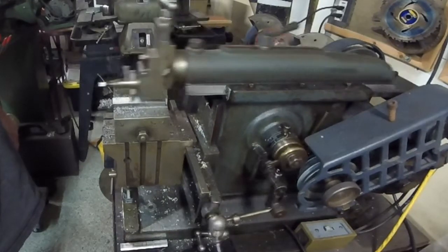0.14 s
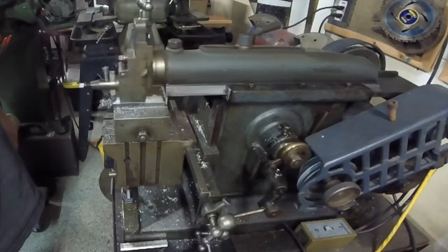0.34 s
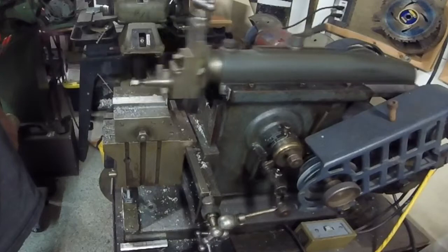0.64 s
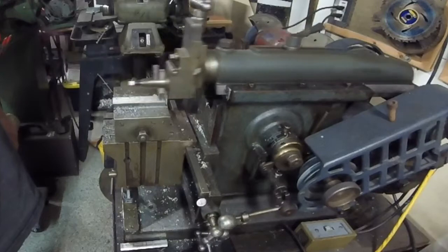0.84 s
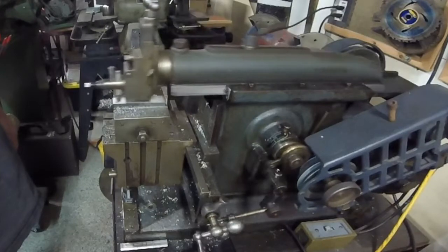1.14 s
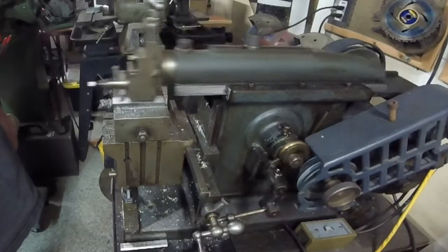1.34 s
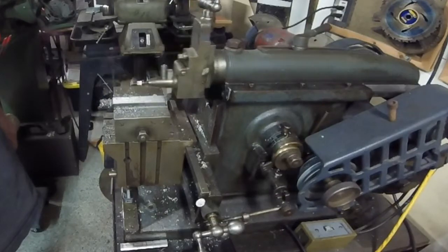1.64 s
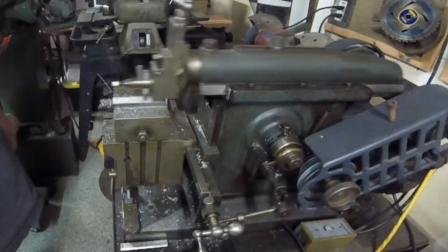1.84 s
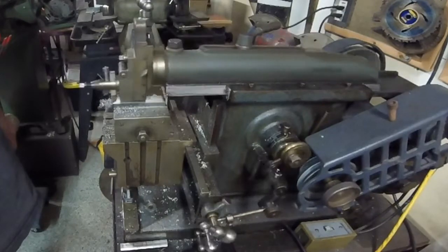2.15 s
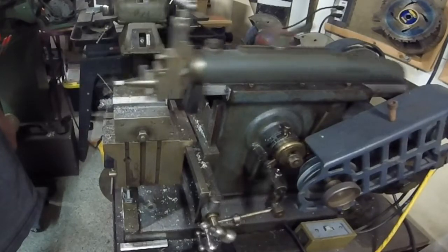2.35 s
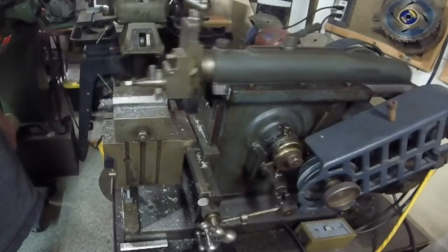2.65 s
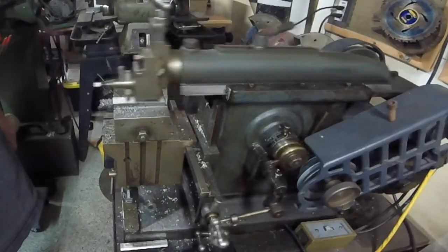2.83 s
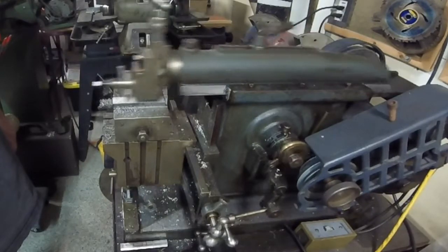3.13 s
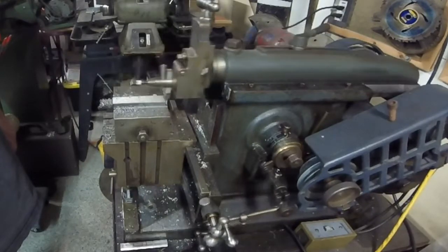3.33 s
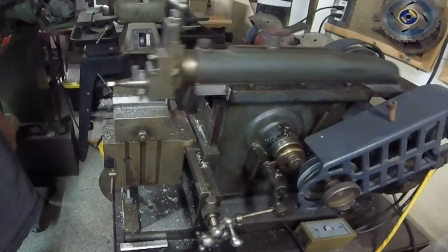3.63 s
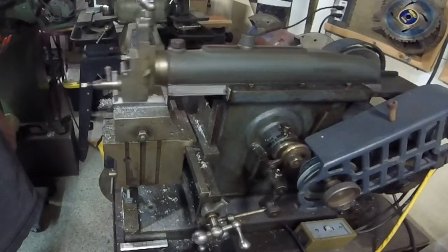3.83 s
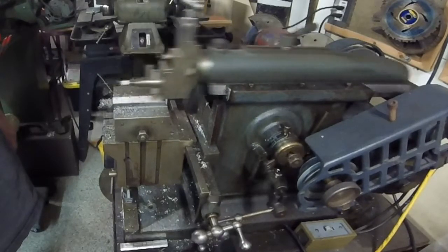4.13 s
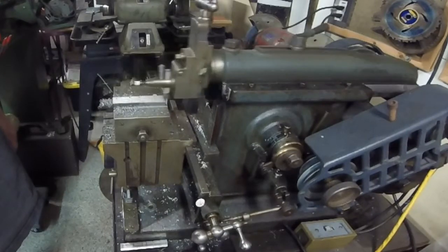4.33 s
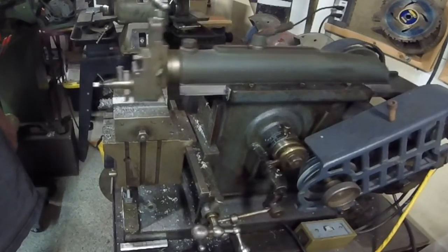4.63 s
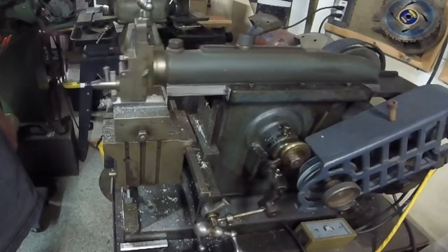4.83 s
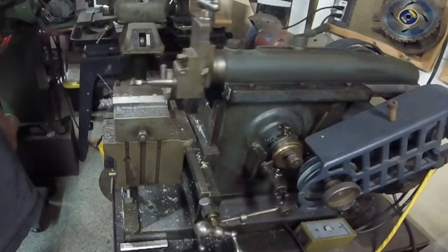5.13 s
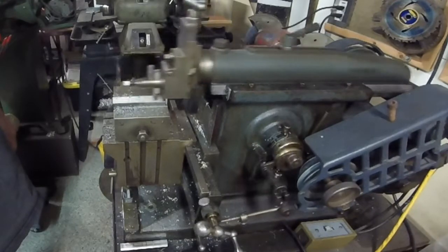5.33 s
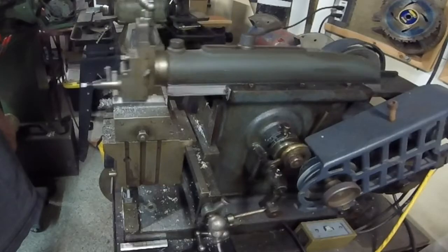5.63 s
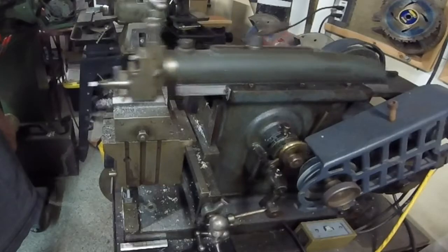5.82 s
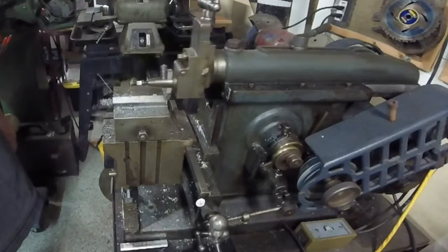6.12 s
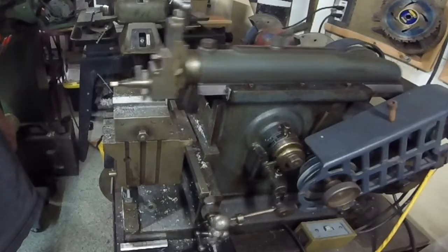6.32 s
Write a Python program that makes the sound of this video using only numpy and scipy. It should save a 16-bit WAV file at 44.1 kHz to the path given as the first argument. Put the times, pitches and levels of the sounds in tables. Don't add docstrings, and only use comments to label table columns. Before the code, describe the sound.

A motor hums low and constant beneath coarse gear rumble as a shaper's ram slides on its ways. Each cycle brings a crisp, fast burst of four metallic clacks, then a swelling cut with buzz and hiss, then soft knocks and a thump at reversal. Faint ticks fall between, and light steel scraping appears midway and near the end. Close single microphone, small workshop, short faint echoes.

```python
import sys
import numpy as np
from scipy import signal
from scipy.fft import rfft, irfft, next_fast_len
from scipy.io import wavfile

SR = 44100
rng = np.random.default_rng(int(sys.argv[2]) if len(sys.argv) > 2 else 0)


def transcribe(signal):
    frames = np.atleast_2d(signal).T
    limited = np.clip(frames, -1, 1)
    pcm = np.round(limited * 32767).astype(np.int16)
    wavfile.write(sys.argv[1], SR, pcm)


def invert_db(x):
    u = np.asarray(x, float) / 20
    return 10 ** u


N = 285315

# first_tooth_s, pawl_peak_db, load of the following cut_db, its friction_db
STROKES = [
    (-.337, -22, -0.1, 0),
    (0.5524, -21.5, -0.3, 0),
    (1.4415, -18, 0.4, 0),
    (2.3308, -19, 0.4, 1.5),
    (3.2179, -19.5, -0.4, 0.2),
    (4.1077, -20, -1, 1),
    (5.02, -20.5, -0.2, 0.3),
    (5.906, -21.5, 0.4, 0.2),
    (6.795, -20, 0, 0),
]
# idle_db, cut_gain_db, crest_s after the first tooth,
# end_s before the next teeth, sharpness (a power), return_gain_db
ANSWERS = dict(base=(-33.5, 10.5, 0.41, 0.02, 0.48, -0.6), column=(-43, 17, 0.64, 0.2, 0.1, 0.5),
           frame=(-47.5, 11, 0.61, 0.23, 0.47, 3.5))
# pitch_hz, level_db per Hz
BUZZ = [(410, -45), (700, -2), (752, -8.5), (813, -3.5), (1110, -10.5), (1210, -5.5), (1370, -14.5),
        (1890, -9.5), (2320, -24), (3300, -33), (4290, -54), (7260, -120)]
# pitch_hz, level_db per Hz
WAYS = [(1350, -19), (2300, -9), (2690, -3), (3100, -1), (4110, -2.5), (5200, -2.5), (5540, -8),
        (6330, -3.5), (7520, -16.5), (8200, -6), (9080, -15.5), (11000, -16), (15000, -35)]
# pitch_hz, level_db per Hz
CLACK = [(410, -28), (700, -3), (1130, -11), (1240, -1), (1530, -7.5), (2000, -3.5), (2310, -11),
         (3160, -2), (3990, -7), (5240, -5), (5660, -9.5), (6120, -5.5), (7340, -8.5), (11400, -17.5),
         (15600, -30)]


def rms_one(x):
    return x / np.sqrt(np.mean(x ** 2) + 1e-20)


def drift(rate):
    r = np.exp(-80 * np.pi * rate / SR)
    slow = signal.lfilter([1], [1, -2 * r, r * r], rng.standard_normal(N // 40 + 2002))[2000:]
    return np.interp(np.arange(N) / 40, np.arange(len(slow)), rms_one(slow))


def above(x, hz):
    return signal.sosfilt(signal.butter(2, hz, "high", fs=SR, output="sos"), x)


def between(x, low_hz, high_hz, order=2):
    return signal.sosfilt(signal.butter(order, [low_hz, high_hz], "band", fs=SR, output="sos"), x)


def colour(x, spectrum):
    hz, db = np.transpose(spectrum)
    size = next_fast_len(len(x), True)
    grid = np.arange(size // 2 + 1) * SR / size + 1
    gain = invert_db(np.interp(np.log(grid), np.log(hz), db, -120, -120))
    return irfft(rfft(x, size) * gain, size)[:len(x)]


def resonate(x, peaks):
    out = 0
    for k, (hz, width, db) in enumerate(peaks):
        r = np.exp(-np.pi * width / SR)
        a = [1, -2 * r * np.cos(2 * np.pi * hz / SR), r * r]
        out = out + (-1) ** k * invert_db(db) * signal.lfilter([(1 - r * r) / 2, 0, (r * r - 1) / 2], a, x)
    return out


def ring(clicks, hz, t60):
    r, w = invert_db(-60 / (t60 * SR)), 2 * np.pi * hz / SR
    return signal.lfilter([0, np.sin(w)], [1, -2 * r * np.cos(w), r * r], clicks + 1e-18)


def grains(per_s, spread_db):
    out = np.sign(rng.random(N) - .5) * (rng.random(N) < per_s / SR)
    out[out != 0] *= invert_db(spread_db * np.minimum(rng.exponential(1, N)[out != 0], 4))
    return rms_one(out)


def strikes(seconds, levels_db):
    clicks = np.zeros(N)
    clicks[np.round(np.asarray(seconds) * SR).astype(int)] = invert_db(levels_db)
    return clicks


def dying(clicks, t60):
    return signal.lfilter([1], [1, -invert_db(-60 / (t60 * SR))], clicks + 1e-18)


def hump(start, crest, end):
    return np.sin(np.pi / 2 * np.interp(np.arange(0, N / SR, .001), [start, crest, end], [0, 1, 0])) ** 2


def ram_level(idle_db, cut_db, crest, early, sharpness, return_db, axis=0):
    db = 0
    for (s, _, *effort_db), after in zip(STROKES, STROKES[1:]):
        cut = hump(s + 0.29, s + crest, after[0] - early) ** sharpness
        quick_return = hump(s - .13, s + 0.02, s + .36)
        db = db + (cut_db + effort_db[axis]) * cut + return_db * quick_return
    return idle_db + np.interp(np.arange(N) / SR * 1000, np.arange(len(db)), db)


def hum_level():
    # deepest_s, sag_db, rebound_db
    sags = [
        (.845, -6, 0),
        (1.78, -6, 3),
        (2.655, -8, 3),
        (3.42, -2, 0.5),
        (4.43, -11, 1),
        (5.285, -5, 2.5),
        (6.205, -15, 3.5),
    ]
    sag_s, rebound_after_s, rebound_s = 0.025, 0.071, 0.026
    t = np.arange(N) / SR
    dips = 0
    for s, sag, up in sags:
        dips = dips + sag * np.exp(-((t - s) / sag_s) ** 2)
        dips = dips + up * np.exp(-((t - s - rebound_after_s) / rebound_s) ** 2)
    return ram_level(-26.5, 1.5, 0.6, 0.092, 1, 0) + dips + 0.66 * drift(8.0)


def motor():
    # multiple of the hum pitch, level_db against it, wobble_db
    hum_orders = [(2.0, -14, 1.5), (3.0, -12, 3.0)]
    hum_hz, rotor_hz = 119.94, 29.63
    t = np.arange(N) / SR
    phase = 2 * np.pi * hum_hz * t + 0.24 * drift(2.8)
    turn = 2 * np.pi * rotor_hz * t
    upper = 0
    for k, db, wobble in hum_orders:
        upper = upper + invert_db(db + wobble * drift(5.8)) * np.sin(k * phase + 0.52 * drift(4.9))
    main = (1 + 0.06 * np.sin(turn + 1.55 * drift(2.3))) * np.sin(phase)
    rotor = invert_db(-50 + 2.5 * drift(2.3)) * np.sin(2 * turn)
    return np.sqrt(2) * (invert_db(hum_level()) * main + invert_db(-26.5) * upper + rotor)


def gear_rumble(casting):
    return rms_one(sum(resonate(invert_db(1.5 * drift(33)) * grains(900, spread_db=2.0), [peak]) for peak in casting))


def gears():
    # pitch_hz, width_hz, level_db
    base = [(137.7, 25.5, 0.5), (215, 13, -6), (268, 32, 1.5), (277, 56, -6.5), (349.7, 48.4, 2),
            (400, 87, -13.5)]
    # pitch_hz, width_hz, level_db
    column = [(491, 35, -7.5), (532, 10.5, 2.5), (566.5, 18.4, -1.5), (650.7, 13.7, 0.5), (730, 46, -11.5),
              (917, 17, -16)]
    base_db, column_db = ram_level(*ANSWERS["base"]), ram_level(*ANSWERS["column"])
    rumble = invert_db(base_db - 2.5) * gear_rumble(base) + invert_db(column_db - 2.5) * gear_rumble(column)
    rumble = signal.sosfilt(signal.butter(2, 1100, fs=SR, output="sos"), rumble)
    mesh = np.sin(2 * np.pi * 543.6 * np.arange(N) / SR + 1.22 * drift(4.5))
    mesh_db = -41.5 + 0.94 * (column_db - column_db.mean()) + 3.6 * drift(4.9)
    return rumble + invert_db(mesh_db) * mesh


def sliding_ram():
    # pitch_hz, width_hz, level_db
    ram_modes = [(1850, 40, -2.5), (2072, 94, 3.5), (3180, 71, 1), (6250, 120, 6.5), (7900, 330, -10)]
    ways_answer = (-53.5, 9, .42, .12, .4, 4.0)
    buzz_db = ram_level(*ANSWERS["frame"])
    ways_db = ram_level(*ways_answer, axis=1)
    slide = rng.standard_normal(N) * invert_db(0.99 * drift(22))
    buzz = rms_one(colour(grains(1500, spread_db=0.5), BUZZ)) + invert_db(8.0) * resonate(slide, ram_modes[:2])
    hiss = rms_one(colour(slide, WAYS)) + invert_db(7.0) * resonate(slide, ram_modes[2:])
    hiss += (invert_db(0.36 * (ways_db - ways_db.mean())) - 1) * between(hiss, 7000, 12500)
    whine_peak = [(5230, 200, 0)]
    whine = rms_one(resonate(resonate(slide, whine_peak), whine_peak))
    whine_db = 0.73 * ways_db - 33 + 4 * drift(9)
    return invert_db(buzz_db - 1.5) * buzz + invert_db(ways_db - 5.5) * hiss + invert_db(whine_db) * whine


def shop_rumble():
    # pitch_hz, level_db per Hz
    rumble_colour = [(15, -61), (25, -6), (42, -20), (65, -28), (89, -30), (120, 6), (145, 4.5), (184, -14),
                     (363, -4), (446, -19), (603, -2.5), (1100, -39), (1430, -67), (2420, -120)]
    return invert_db(-33) * rms_one(colour(rng.standard_normal(N), rumble_colour))


def knocks():
    # start_s, peak_db, thud_db against the peak, ring_hz
    slack = [(0.0738, -38, 1, 1850), (0.8084, -32, 3, 2034), (0.9692, -38, 0, 1850),
             (1.7026, -44.5, 20, 2030), (1.86, -38, 5.7, 1850), (2.589, -40, 12.5, 2084),
             (2.7426, -34, 11, 1830), (3.478, -40, 15.5, 2006), (3.6254, -38, -11, 1840),
             (4.366, -36, 8.5, 2000), (4.5123, -35.5, -3, 1850), (5.2811, -37, 11, 2090),
             (6.166, -31, 6.5, 2025)]
    out = np.zeros(N)
    for s, db, _, hz in slack:
        out += ring(strikes([s, s + .007], [db - 4.5, db - 1.5]), hz, 0.1)
        for ratio, level_db, t60 in [(1.045, -9.0, 0.077), (1.14, -2.0, 0.022), (1.1, -7.0, 0.025)]:
            out += ring(strikes([s], db + level_db), ratio * hz, t60)
    s, db, thud_db = np.transpose(slack)[:3]
    out += rms_one(colour(rng.standard_normal(N), BUZZ)) * dying(strikes(s, db - 1.0), 0.1)
    for hz, level_db, t60 in [(326, 12, 0.034), (617, -1, 0.042)]:
        out += ring(strikes(s, db + thud_db + level_db), hz, t60)
    return out


def ticks():
    # start_s, peak_db, pitch_hz
    chips = [
        (0.4835, -47, 2510),
        (1.23, -53, 3180),
        (3.5149, -43.5, 4650),
        (3.5896, -44, 5200),
        (3.724, -37, 4880),
        (3.9295, -34, 2990),
        (4.4498, -39.5, 2480),
        (5.6047, -42, 5260),
    ]
    hiss = rms_one(above(colour(rng.standard_normal(N), WAYS), 1600))
    s, db = np.transpose(chips)[:2]
    out = hiss * dying(strikes(s, db - 6.0), 0.23)
    for s, db, hz in chips:
        out += ring(strikes([s], db + 0.5), hz, 0.035)
    return out


def thumps():
    # start_s, peak_db, pitch_hz
    backlash = [
        (1.044, -12.5, 357),
        (1.957, -3.5, 326),
        (2.838, -14, 293),
        (4.633, -12, 310),
        (5.535, -9.5, 276),
        (6.382, -12.5, 284),
    ]
    return sum(ring(ring(strikes([s], db - 41.5), hz, 0.038), hz, 0.071) for s, db, hz in backlash)


def small_hits():
    return between(knocks() + ticks() + thumps(), 220, 9000)


def ratchet():
    # after_first_s, level_db, low_ring_db against the peak
    teeth = [
        (0.0, 0.86, -12.5),
        (0.0533, 0.1, -9.5),
        (0.1065, 0.5, -10),
        (.1670, 0.04, -10),
    ]
    # handle_ring_hz, screw_ring_hz, level_db
    handle_rings = [(1222, 2010, 1.5), (1206, 2045, -0.5), (1692, 2035, 0.5), (1453, 2200, 0),
                    (1212, 2045, -0.5), (1220, 2170, -2), (1450, 2010, 0)]
    # pitch_hz, width_hz, level_db
    wheel = [(620, 120, -6), (850, 120, -6), (1228, 70, -6), (2040, 90, -6), (3070, 70, -4), (3250, 70, -2),
             (3680, 80, -4), (3950, 70, -6), (4350, 90, -6), (4725, 90, -5), (5300, 100, -4),
             (5950, 80, -6), (6300, 80, -6), (6610, 70, -6), (6830, 70, -7), (7920, 90, -8),
             (8340, 100, -8), (9300, 120, -14), (10300, 120, -15), (11230, 150, -13)]
    drops = []
    for (at, db, *_), (handle, screw, turn_db) in zip(STROKES[1:], handle_rings):
        for after, tooth_db, low in teeth:
            drops.append((at + after, db + tooth_db, low + turn_db, handle, screw))
    s, peak_db, low_db, *rings_hz = np.transpose(drops)
    count = len(s)
    rings_hz = [hz * (1 + 0.012 * rng.standard_normal(count)) for hz in rings_hz]
    rings_hz.append(rng.choice([hz for hz, _, _ in wheel[4:10]], count))
    bounce = s + .0062 + 0.00064 * rng.standard_normal(count)

    clatter, out = grains(8000, spread_db=1.5), np.zeros(N)
    for hz, width, db in wheel:
        level = peak_db + rng.normal(0, 2.6, count)
        shape = dying(strikes(s, level) + strikes(bounce, level - 6.5), 0.017)
        out += resonate(shape * clatter, [(hz, .7 * width, db + 10.5)])

    t = np.arange(SR // 6) / SR
    for hz, db, t60 in zip(rings_hz, [low_db - 5.0, low_db - 5.0, -17.0], [.13, .11, .06]):
        swell = (1 - np.exp(-t / 0.0016)) * invert_db(-60 * t / t60)
        for at, pitch, gain in zip((s * SR).astype(int), hz, invert_db(peak_db + db)):
            out[at:at + len(t)] += gain * swell * np.sin(2 * np.pi * pitch * t)

    first, second = strikes(s, peak_db), strikes(bounce, peak_db)
    crunch = rms_one(colour(grains(12000, spread_db=3.2), CLACK))
    crunch = crunch - resonate(crunch, [(2760, 350, -11.5)])
    crack = invert_db(-15.5) * dying(first, 0.025) * crunch
    tail = signal.sosfilt(signal.cheby2(8, 30, 14300, fs=SR, output="sos"), crunch)
    tail_level = invert_db(-18.0) * dying(first + second, 0.027) + invert_db(-17.0) * dying(first, 0.33)
    return out + crack + tail_level * tail


def steelwork(x, t60, count=120):
    t = np.arange(SR // 8)[:, None] / SR
    hz = np.linspace(2900, 13600, count) + rng.uniform(-35, 35, count)
    db, phase = rng.uniform(-4, 4, count), rng.random(count)
    modes = np.sum(invert_db(db - 60 * t / t60) * np.sin(2 * np.pi * (hz * t + phase)), axis=1)
    return signal.fftconvolve(x, modes / np.sqrt(np.sum(modes ** 2)))[:N]


def scrapes():
    # start_s, rise_s, peak_db, fall_db per s, low_part_db against the peak
    strokes_by_hand = [
        (2.611, 0.014, -35, 190, -1),
        (2.764, 0.022, -34, 154, 2),
        (5.428, 0.014, -41, 127, -4),
        (6.225, 0.013, -32.5, 194, 5.5),
        (6.311, 0.057, -35.5, 105, 10.5),
    ]
    # pitch_hz, width_hz, level_db
    scraped_modes = [(1418, 5.1, 1.5), (2110, 8.1, 5.5), (2480, 45, -25), (3140, 21, -7), (3520, 13, -6),
                     (4030, 36, -11), (4387, 8.3, -7), (5230, 29, -2), (6000, 16, -7), (6180, 61, -9),
                     (6620, 21, -6.5), (6900, 46, -24), (8100, 65, -11), (8460, 90, -14), (10500, 110, -40),
                     (11250, 72, -22)]
    # start_s, peak_db, pitch_hz, t60_s
    part_rings = [
        (6.229, -39, 1420, .6),
        (6.345, -45, 2100, .3),
        (6.345, -42, 3100, .5),
    ]
    slips = grains(6000, spread_db=2.5) * invert_db(1.5 * drift(40))
    body = invert_db(1.5) * rms_one(resonate(slips, scraped_modes)) + rms_one(colour(slips, CLACK))
    bright = rms_one(above(above(body, 3700), 3700))
    dull = rms_one(between(body, 1300, 4500, order=3))
    out = sum(ring(strikes([s], db), hz, t60) for s, db, hz, t60 in part_rings) * invert_db(2.0 * drift(25))
    for s, rise, peak_db, fall, low_db in strokes_by_hand:
        for part, db, swell in [(bright, -1.0, rise), (dull, low_db - 7.0, 0.46 * rise)]:
            t = np.arange(N) / SR - s - swell
            shape_db = np.minimum(11 * t / swell, -fall * t)
            out = out + (t > -swell) * invert_db(peak_db + db + shape_db) * part
    return out


def workshop(x):
    t60_s, level_db = 0.28, -13
    t = np.arange(SR // 2) / SR
    echoes = rng.standard_normal(len(t)) * invert_db(-60 * t / t60_s) * (t > .004)
    echoes = signal.lfilter([.6], [1, -.4], echoes)
    return invert_db(level_db) * signal.fftconvolve(x, echoes / np.sqrt(np.sum(echoes ** 2)))[:N]


def scene():
    pawl = ratchet()
    hits = pawl + invert_db(-6.5) * steelwork(pawl, t60=0.068) + scrapes() + small_hits()
    machine = motor() + gears() + sliding_ram() + shop_rumble()
    return (machine + hits + workshop(hits))[None, :]


def band_limit(x):
    return signal.sosfilt(signal.butter(12, 15730, fs=SR, output="sos"), x)


def record(dry):
    dulled = signal.sosfilt(signal.butter(6, 14500, fs=SR, output="sos"), dry)
    return band_limit(dulled)


dry = scene()
out = record(dry)
transcribe(out)
```